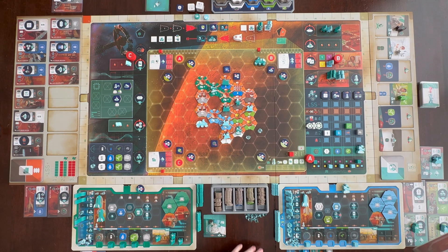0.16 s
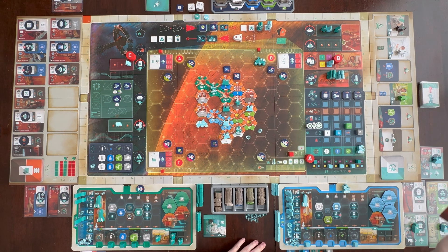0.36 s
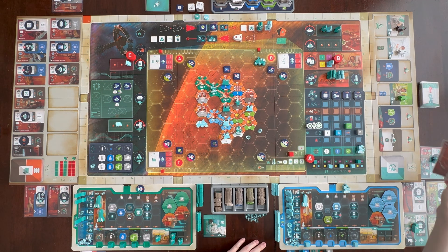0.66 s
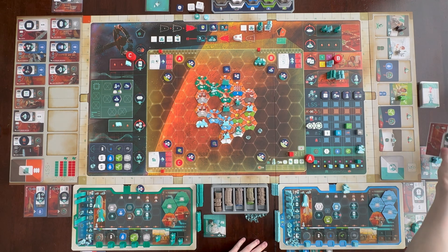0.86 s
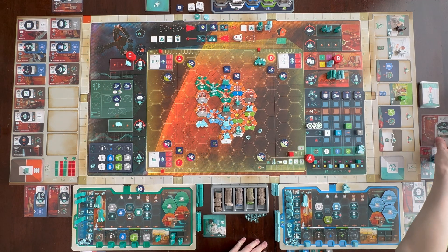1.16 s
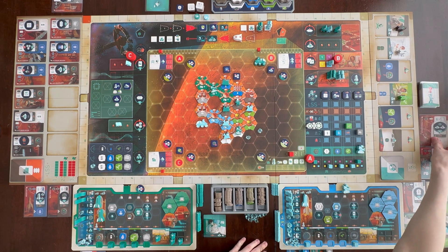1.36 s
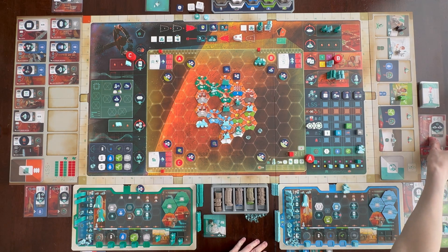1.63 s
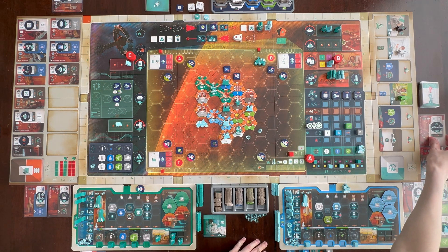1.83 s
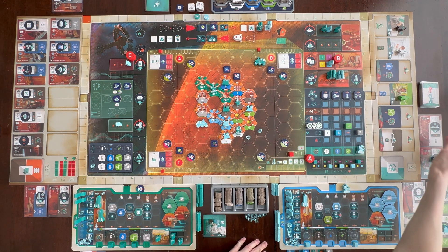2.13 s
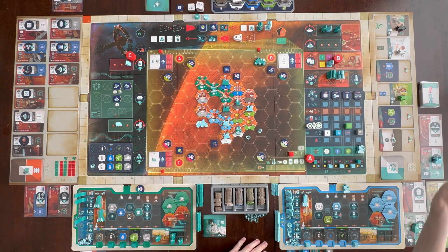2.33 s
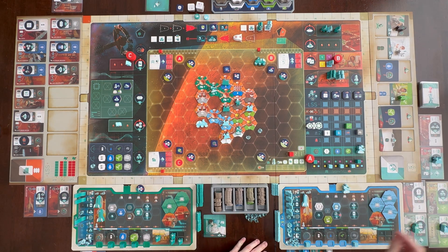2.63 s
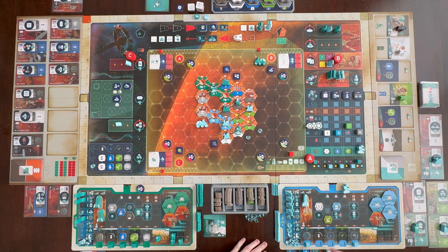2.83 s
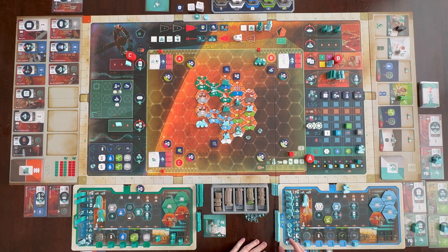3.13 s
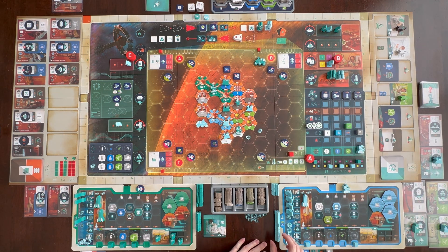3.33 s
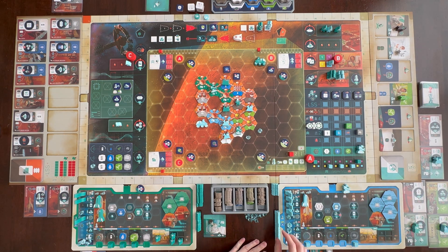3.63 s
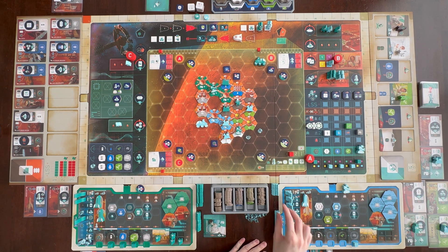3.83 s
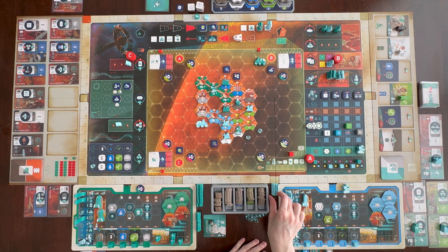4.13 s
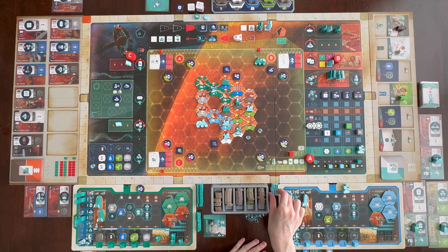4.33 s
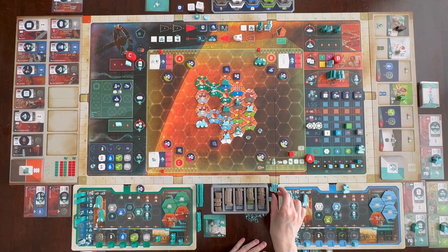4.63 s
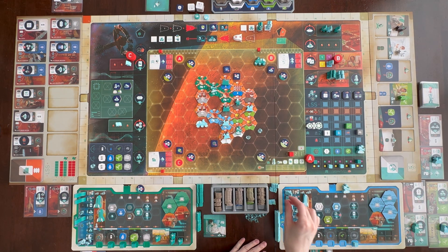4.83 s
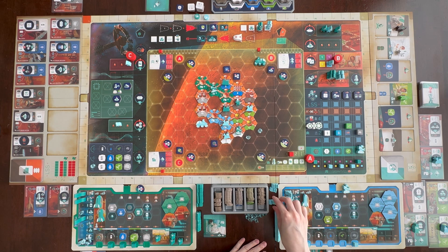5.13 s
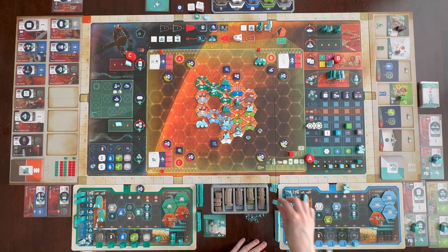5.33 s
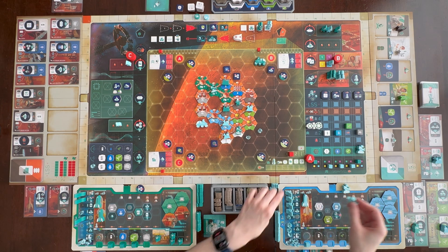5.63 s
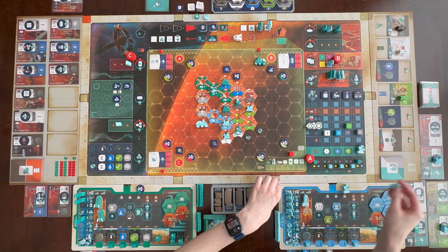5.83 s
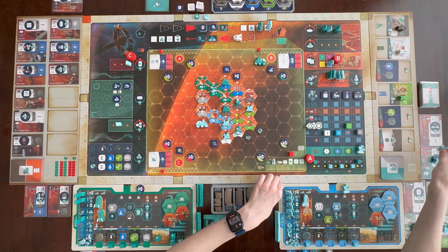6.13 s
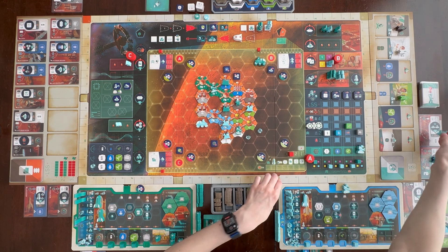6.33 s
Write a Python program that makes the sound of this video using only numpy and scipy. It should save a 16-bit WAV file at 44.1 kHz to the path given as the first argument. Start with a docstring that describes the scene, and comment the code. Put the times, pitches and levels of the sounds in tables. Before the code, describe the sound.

Card edges snap softly, then plastic game pieces clatter in a tray and on a table, while an engine idles outside a quiet humming room.

```python
"""A table in a quiet, lively room: plastic game pieces are picked from a tray and set down, cards are flicked earlier.
Knocks and slides ring the piece, the tray and the table; cards snap close by and drier, and forearms thud.
Outside an engine idles and then pulls away, built from the orders of its cycle.
Underneath lie a low hum of narrow noise bands and the hiss and rumble of the room, shaped from random spectra."""
import sys
import numpy as np
from scipy import signal
from scipy.fft import rfft, irfft
from scipy.io import wavfile
from scipy.ndimage import uniform_filter1d

SR = 44100
rng = np.random.default_rng(int(sys.argv[2]) if len(sys.argv) > 2 else 0)


def transcribe(u):
    """Save the signal u as a 16-bit wav file named by the first command-line argument.

    u: samples, shape (n,) or (channels, n), limited to [-1, 1]; the rate is SR.
    q: integer samples, one column per channel.
    """
    v = np.clip(np.atleast_2d(u).T, -1, 1)
    q = np.round(v * 32767).astype(np.int16)
    wavfile.write(sys.argv[1], SR, q)


N = 285194

# Bodies that ring: (pitch [Hz], width of the first of two resonances [Hz], relative level [dB])
# floor of the tray
TRAY_MODES = [(763, 220, 2), (1036, 230, 6.5), (1456, 480, 4), (2040, 440, 5)]
# thin walls of the tray
RIM_MODES = [(2700, 800, 2.5), (3500, 1000, 1.5), (5200, 2200, -5.5)]
# table top
TABLE_MODES = [(214, 90, 0.5), (330, 88, -4.5), (458.5, 32.4, 3.5), (748, 310, -2.5)]
# dry clack of hard edges, also the brightness of cards
CLACK_MODES = [(5980, 1800, 3.5), (8200, 1300, -1.5), (10870, 3150, -2), (14500, 2900, -2)]


def gain_of(db):
    """Decibels to a factor."""
    return 10 ** (np.asarray(db) / 20)


def evened(x):
    """Scales to rms 1."""
    return x / np.sqrt(np.mean(x ** 2) + 1e-20)


def read(points, hz):
    """A spectrum read on a log-frequency axis."""
    f, value = np.transpose(points)
    return np.interp(np.log(hz + 1), np.log(f + 1), value)


def curve(rows, column):
    """One column of a table at every sample."""
    rows = np.array(rows)
    return np.interp(np.arange(N) / SR, rows[:, 0], rows[:, column])


def within(rows, fade):
    """A soft window over the span of a table."""
    t0, t1 = rows[0][0], rows[-1][0]
    return np.interp(np.arange(N) / SR, [t0 - fade, t0, t1, t1 + fade], [0, 1, 1, 0])


def resonate(x, hz, width):
    """A resonance of gain near 1 at its centre."""
    r = np.exp(-np.pi * width / SR)
    return 2 * signal.lfilter([1 - r], [1, -r * np.exp(2j * np.pi * hz / SR)], x).real


def ring(x, modes):
    """Drives a body of modes; white noise of rms 1 comes out near rms 1."""
    click = np.eye(1, 2000)[0]
    both = np.vstack([x, np.pad(click, (0, x.shape[1] - 2000))])
    out = 0
    for k, (hz, width, db) in enumerate(modes):
        mode = resonate(resonate(both, hz, width), hz, 3 * width)
        out = out + (-1) ** k * gain_of(db) * mode
    return out[:-1] / np.linalg.norm(out[-1])


def contacts(times, db, lean_db, length, lag, hz=None, width=None):
    """Each contact is a sharp tick, then a short rattle, ringing at hz if given; the left ear is lag samples late."""
    out, u = np.zeros((2, N)), np.arange(2000) / SR
    chance = rng.standard_normal((len(times), 2000))
    chance[:, 0] = 2.64  # the tick
    for k, noise in enumerate(chance):
        burst = gain_of(db[k]) * noise * np.exp(-u / max(length[k], 1e-4))
        if hz is not None:
            rung = resonate(resonate(burst, hz[k], width), hz[k], 1.6 * width)
            burst = rung * .77 * np.linalg.norm(burst) / np.linalg.norm(rung)
        # a lean changes the right ear more than the left
        for ear, (weight, late) in enumerate([(1.5, lag), (-2.0, 0)]):
            at = round(times[k] * SR + late)
            out[ear, at:at + 2000] += gain_of(weight * lean_db[k] / 2) * burst
    return out


def pieces():
    """Knocks ring the piece, the tray and the table under it; hard edges add a dry bright clack; slides scrape."""
    # pieces knocking tray and table: (time [s], level [dB], ring of the piece [Hz],
    # hard-edge share before rim and clack scaling [dB], table share [dB],
    # lean to the left before ear weights [dB], upper ring [Hz], upper share [dB], tray share [dB])
    knocks = [(4.093, -33, 1350, -22, -39, -2, 2200, -4.5, -22),
              (4.186, -39, 2300, -24, -31, -1.5, 3500, -9, -10),
              (4.203, -37, 1310, -38, -28, 0, 2450, -9.5, -12),
              (4.336, -55.5, 1990, -16, -11, -6, 3170, -8.5, -8),
              (4.458, -40.5, 2030, -24, -14, -3, 3280, -9, -8),
              (4.490, -33, 1930, -5.5, -21, -1.5, 3260, -5, -10),
              (4.551, -43, 1800, -6.5, -8, -8, 3000, -8, -8),
              (4.5637, -24, 2040, 2.5, -21, -1, 3820, 0, -3.5),
              (4.571, -26, 810, -4, -13, -2.5, 2780, 2, -3),
              (4.593, -30, 2000, -0.5, -18, -1.5, 3000, -5, -8),
              (4.601, -31, 1000, -11, -17, -4.5, 2500, 1.5, -13),
              (4.6336, -32.5, 785, 6.5, -16, -3, 3300, -1.5, -5),
              (4.645, -34, 810, -6, -13, -1, 1800, -5, -8),
              (4.6637, -32, 980, 8.5, -18, -2, 3600, -12, -10),
              (4.675, -37, 2230, -3, -18, -3, 3300, -1, -9), (4.692, -39, 1090, 5, -14, -1.5, 3000, -1, -8),
              (4.706, -38.5, 930, -5, -13.5, 0.5, 2900, -5, -14),
              (5.182, -45, 2020, -11, -14, -3.5, 3300, -7, -7),
              (5.189, -45, 1020, -16, -13, -3.5, 3250, -3, -3),
              (5.211, -50.5, 2000, -20, -12, -2.5, 3200, -9, -6),
              (5.838, -63, 2580, -12, -18, -4.5, 3460, -5, -12),
              (5.884, -38.5, 1800, -2, -12, -3, 4800, -4, -7),
              (5.892, -35.5, 1810, -7, -11, -3.5, 2580, -4.5, -3.5),
              (5.913, -33, 2130, -4, -10, -3.5, 2900, -7, -5),
              (5.925, -33.5, 1130, -20, -16, 0.5, 2100, -8.5, -12),
              (6.2263, -40, 1700, 2, -10, -1.5, 3600, -2, -3), (6.237, -40, 1940, -6, -7, -4, 5300, -6, -1)]
    # fingers sliding pieces: (loudest time [s], level [dB], time to swell by 20 dB [s],
    # bright share before the body levels [dB])
    slides = [(4.178, -49, 0.08, -9), (4.345, -68, 0.22, -3), (4.455, -56, 0.05, -1),
              (4.604, -36.5, 0.005, 0), (4.699, -38, 0.0433, -0.5), (5.32, -60, 0.06, -10),
              (5.364, -66.5, 0.1, -0.5), (5.874, -50.5, 0.018, -4), (5.9, -47.5, 0.015, 1),
              (6.21, -56.5, 0.015, -1), (6.24, -49.5, 0.014, -2)]
    s, db, hz, edge_db, table_db, lean_db, upper_hz, upper_db, tray_db = np.transpose(knocks)

    # 4.4 ms decay at -34 dB; a harder knock is a shorter contact
    length = 0.0044 * gain_of(0.25 * (-34 - db))
    own = contacts(s, db, lean_db, length, -10.0, hz, 300)
    own = own + contacts(s, db + upper_db, lean_db, length, -7.0, upper_hz, 700)
    tray = contacts(s, db + tray_db, lean_db, length, 1.6)
    rim = contacts(s, db + edge_db - 3, lean_db, length * 0.78, -6.0)
    table = contacts(s, db + table_db, lean_db, length * 2.36, 5.5)
    # the clack grows faster than the rim with the hard edge
    clack_db = db + 1.38 * edge_db + 1.5
    clack = contacts(s, clack_db, lean_db, np.full(len(s), 7e-4), -8.0)

    # many tiny contacts: noise of uneven strength
    roughness = evened(uniform_filter1d(rng.standard_normal(N), 100))
    grit = rng.standard_normal(N) * gain_of(4.0 * roughness)
    s, db, swell, bright_db = np.transpose(slides)[..., None]
    u = np.arange(N) / SR - s
    fade_db_per_s = 340
    strokes = evened(grit) * gain_of(db + np.minimum(20 * u / swell, -fade_db_per_s * u))

    def to_ears(x):
        """Slides reach the right ear louder and 8 samples later."""
        return gain_of([[-1.5], [1.5]]) * np.array([x, np.roll(x, shift=8)])

    slide = to_ears(strokes.sum(0))
    bright = to_ears((gain_of(bright_db) * strokes).sum(0))
    out = own + ring(tray + slide, TRAY_MODES)
    out = out + ring(rim + gain_of(-5.0) * bright, RIM_MODES)
    out = out + ring(table + gain_of(-10.5) * slide, TABLE_MODES)
    return out + ring(clack + gain_of(-21.0) * bright, CLACK_MODES)


def cards():
    """Stiff card edges let go with a thin bright snap, a lower flex and a ring of the card."""
    # card edges snapping: (time [s], level [dB], lower share [dB], ring of the card [Hz])
    flicks = [(1.058, -54, -6.5, 7700), (1.159, -49, -5, 6900), (1.408, -55, -7, 6960),
              (1.572, -54, -22, 7850), (1.613, -58, -20, 8000), (1.9494, -42.5, -16, 5400),
              (2.765, -66, 1, 5000)]
    s, db, low_db, hz = np.transpose(flicks)
    # the more the card bends, the longer the contact
    length = 0.0025 * gain_of(0.26 * low_db)
    lean_db = np.full(len(s), -4.5)  # to the right, before ear weights
    snap = contacts(s, db, lean_db, length * .5, 20.0)
    flex = contacts(s, db + low_db, lean_db, length * 4, 20.0)
    own = contacts(s, db - 0.5, lean_db, length * 0.54, 20, hz, 1200)
    return ring(snap, CLACK_MODES) + ring(flex, TRAY_MODES[3:] + RIM_MODES) + own + drags()


def drags():
    """A card scrapes along its neighbour; its free end shortens, so the scuff rises."""
    # a card dragged to its edge before it snaps, or brushed in passing:
    # (start [s], length [s], level [dB], first pitch [Hz], last pitch [Hz])
    scrapes = [(1.122, .13, -64.5, 2000, 2596), (1.912, .05, -62, 2490, 4510),
               (5.472, .04, -72, 11000, 11500)]
    width_hz, hiss_db = 1000, -3
    body, hiss = np.zeros((2, N))
    for s, length, db, first_hz, last_hz in scrapes:
        noise = rng.standard_normal((2, 6000))
        u = np.minimum(np.arange(6000) / SR / length, 1)
        turn = np.exp(2j * np.pi * np.cumsum(first_hz + (last_hz - first_hz) * u) / SR)
        # slow noise moved up to the gliding pitch
        scuff = evened((uniform_filter1d(noise[0], round(SR / width_hz)) * turn).real)
        at, shape = round(s * SR), gain_of(db) * np.sin(np.pi * u ** 0.63)
        body[at:at + 6000] += shape * scuff
        hiss[at:at + 6000] += shape * gain_of(hiss_db) * noise[1]
    both = body + ring(hiss[None], CLACK_MODES)[0]
    # louder and earlier at the right ear
    return gain_of([[-1.5], [3.4]]) * np.array([np.roll(both, shift=20), both])


def thuds():
    """Soft blows swell for a moment and shake mostly the table."""
    # forearms landing and shifting on the table:
    # (time [s], level [dB], tray share [dB], time to swell to the peak [s])
    landings = [(0.698, -49, -8.5, 0.011), (0.742, -55, -16, 0.028), (3.161, -67, -8, 0.015)]
    s, db, tray_db, length = np.transpose(landings)[..., None]
    u = np.maximum(np.arange(N) / SR - s, 0) / length
    blows = gain_of(db) * u * np.exp(1 - u) * rng.standard_normal(N)
    both = np.ones((2, 1))
    table = ring(both * blows.sum(0), TABLE_MODES)
    return table + ring(both * (gain_of(tray_db) * blows).sum(0), TRAY_MODES)


def room(x):
    """Sparse taps of random sign from the first table echo on, each band dying at its own speed."""
    # decay of the room: (pitch [Hz], time to fall by 60 dB [s])
    decay = [(250, 0.82), (700, 0.65), (2000, 0.58), (4500, 0.46), (8000, 0.3), (14000, 0.24)]
    # what the walls give back: (pitch [Hz], relative level [dB])
    walls = [(300, -1), (2000, -5), (6000, -2), (8500, 3), (11000, -8.5), (15000, -14)]
    taps = np.zeros((2, SR))
    at = np.arange(100, SR - 20, 20) + rng.integers(0, 20, (2, (SR - 101) // 20))
    np.put_along_axis(taps, at, rng.choice([-1., 1.], at.shape), 1)
    hz, t, z = signal.stft(taps, SR, nperseg=256)
    early = 1 + 1.04 * np.exp(-((t - .011) / 0.0058) ** 2)  # near walls answer in a cluster
    fall_db = read(walls, hz)[:, None] - 60 * t / read(decay, hz)[:, None]
    tail = signal.istft(z * early * gain_of(fall_db), SR, nperseg=256)[1]
    return signal.fftconvolve(x, tail / np.linalg.norm(tail[0]), axes=1)[:, :N]


def street():
    """The engine outside idles unevenly, then pulls away under load, its speed mostly rising."""
    # engine speed, idling and pulling away: (time [s], speed [cycles per second])
    idle_speed = [(0, 23.4), (1.1, 21.4), (1.95, 20.8), (2.05, 22.5), (2.7, 21.4)]
    pull_speed = [(4.4, 21.2), (4.74, 21.7), (5.23, 24.0), (6.1, 26.8), (6.47, 25)]
    # loudness, idling and pulling away: (time [s], level [dB])
    idle_level = [(0.0, -39), (0.55, -37), (0.83, -35.5), (1.2, -45), (1.41, -46.5), (1.96, -43),
                  (2.2, -36), (2.42, -38.5), (2.7, -45.5)]
    pull_level = [(4.4, -52), (4.6, -45.5), (5.06, -41.5), (5.3, -43.5), (5.67, -46.5), (5.81, -36.5),
                  (5.98, -42.5), (6.47, -45)]
    # what comes through exhaust and wall, idling and under load: (pitch [Hz], relative level [dB])
    idle_pipe = [(60, -13.5), (90, -2.5), (112, -2), (135, -4.5), (155, -10.5), (185, -24.5), (245, -16),
                 (300, -32)]
    pull_pipe = [(60, -6), (90, -27), (112, 1), (135, -5), (152, 2), (170, -18.5), (230, -17), (300, -31)]
    idling = engine(idle_speed, idle_level, idle_pipe, 0.11)
    return idling + engine(pull_speed, pull_level, pull_pipe, .02)


def engine(speed, level, pipe, drift):
    """Orders of the engine cycle through exhaust and wall waver in strength and in timing (drift in turns rms)."""
    hz = curve(speed, 1)
    turns, out = np.cumsum(hz) / SR, 0
    coarse = np.arange(N) / 100  # wavering is drawn every 100 samples
    for order in range(2, 14):
        waver = evened(uniform_filter1d(rng.standard_normal(N // 100 + 2), 80))
        waver_db = 3.12 * np.interp(coarse, np.arange(len(waver)), waver)
        slip = rng.standard_normal(N // 100 + 2)
        slip = evened(uniform_filter1d(uniform_filter1d(slip, 25), 25))
        slip = drift * np.interp(coarse, np.arange(len(slip)), slip)
        phase = order * turns + slip + rng.random()
        out = out + gain_of(read(pipe, order * hz) + waver_db) * np.cos(2 * np.pi * phase)
    return gain_of(curve(level, 1)) * out * within(level, 0.26)


def hum():
    """Fuzzy bands from household machines: resonated noise, less alike at the two ears as pitch rises."""
    # bands of the hum: (pitch [Hz], width of each of two resonances [Hz], level [dB])
    bands = [(52.2, 6.6, -48), (125.86, 12.2, -54.5), (229.3, 17.5, -61), (353.7, 12, -71.5),
             (587.6, 38, -69.5)]
    out = 0
    for hz, width, db in bands:
        a, b = rng.standard_normal((2, N))
        ears = np.array([a + b * hz / 600, a - b * hz / 600])
        out = out + gain_of(db) * evened(resonate(resonate(ears, hz, width), hz, width))
    return out


def air():
    """Random short-time spectra with faint patches: the hiss and rumble of the room."""
    # colour of the air: (pitch [Hz], relative level [dB])
    colour = [(15, -44), (25, -14), (43, -5), (65, -5.5), (85, -36), (128, -7.5), (221, -22.5),
              (267, -24.5), (351, -26), (589, -36), (639, -37.5), (6300, -52), (13500, -65.5),
              (15100, -57.5), (16800, -82)]
    # likeness of the ears: (pitch [Hz], left-right correlation)
    likeness = [(60, 0.74), (180, 0.49), (550, -0.21), (1650, 0.036), (4970, -0.12), (15000, 0.17)]
    frames, hz = N // 512 + 5, np.fft.rfftfreq(2048, 1 / SR)
    a, b, c, d, patches = rng.standard_normal((frames, 1025, 5)).T
    patches = evened(uniform_filter1d(uniform_filter1d(patches, 16, 0), 8, 1))
    same, left = np.clip(read(likeness, hz), -1, 1)[:, None], a + 1j * b
    z = np.array([left, same * left + np.sqrt(1 - same ** 2) * (c + 1j * d)])
    z *= gain_of(read(colour, hz)[:, None] + 1.0 * patches)
    sound = signal.istft(z, nperseg=2048, noverlap=1536)[1][:, :N]
    return gain_of(-46) * evened(sound)


def scene():
    """Hands on the table in the room, over the background; the cards are nearer, so drier."""
    # how pieces and thuds lean with pitch: (pitch [Hz], left minus right [dB])
    shade = [(500, 1), (2500, 1.5), (5500, -4), (9500, 3)]
    far, near = pieces() + thuds(), cards()
    # they reach the two ears in different colours
    lean = gain_of(read(shade, np.fft.rfftfreq(N, 1 / SR)) / 2)
    far = irfft(rfft(far) * np.array([lean, 1 / lean]), N)
    outside = street()
    echoes = gain_of(1.5) * room(far + gain_of(-5.0) * near)
    return far + near + echoes + outside + hum() + air()


def record(dry):
    """The low cut of the microphone and the band limit of the recorder."""
    low_cut_hz, edge_hz = 45, 16800
    cut = signal.sosfilt(signal.butter(4, low_cut_hz, "high", fs=SR, output="sos"), dry)
    band_limit = signal.firwin(511, edge_hz, window=("kaiser", 9), fs=SR)
    return signal.oaconvolve(cut, band_limit[None], "same")


dry = scene()
out = record(dry)
transcribe(out)
```